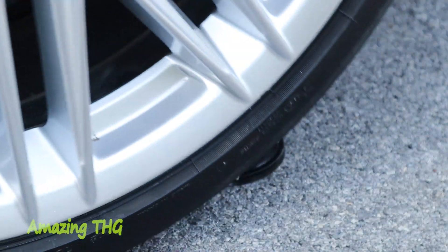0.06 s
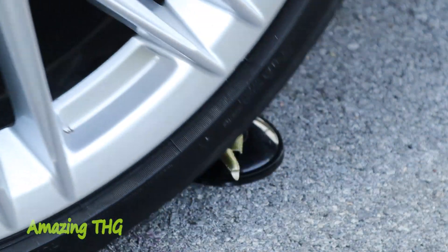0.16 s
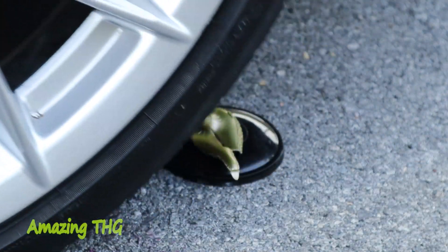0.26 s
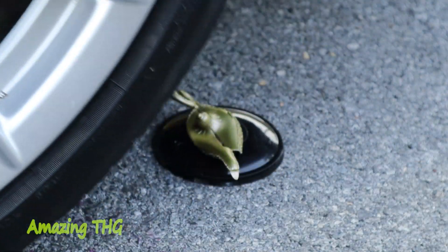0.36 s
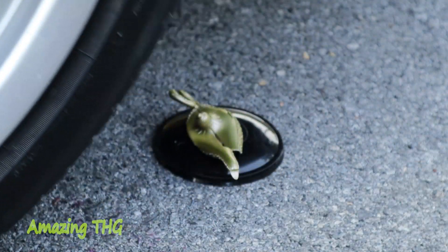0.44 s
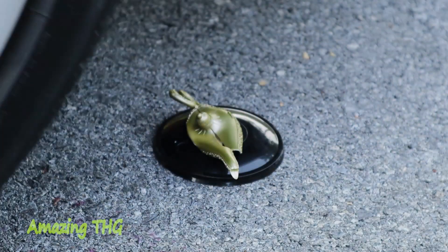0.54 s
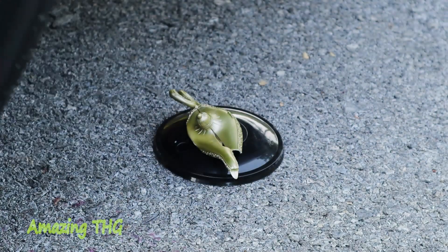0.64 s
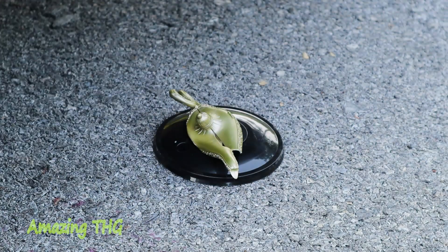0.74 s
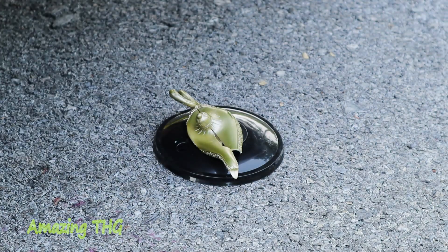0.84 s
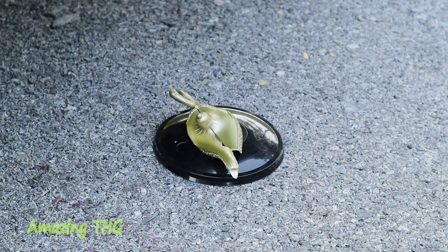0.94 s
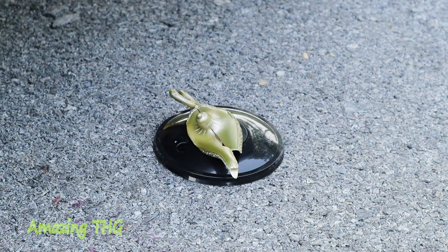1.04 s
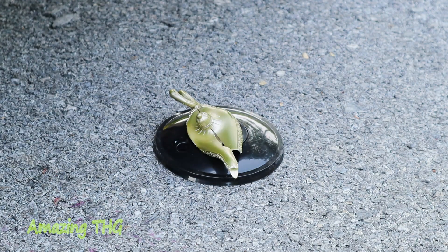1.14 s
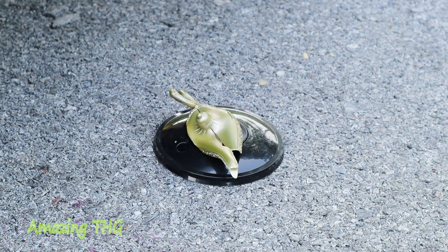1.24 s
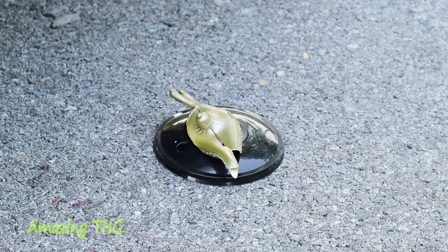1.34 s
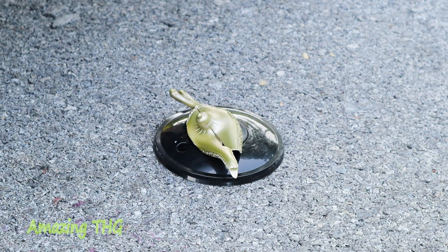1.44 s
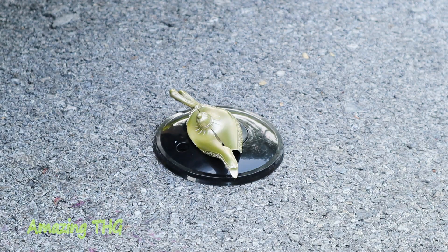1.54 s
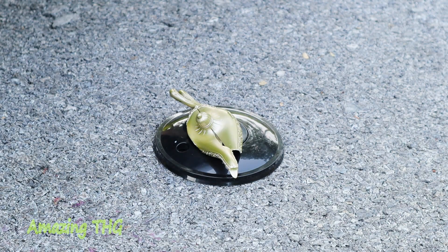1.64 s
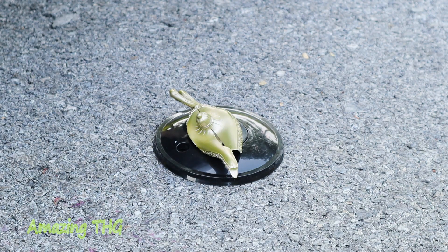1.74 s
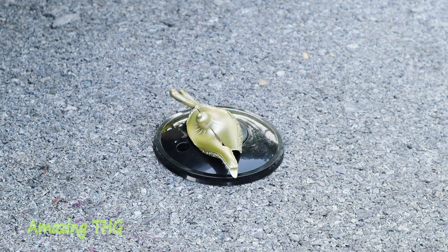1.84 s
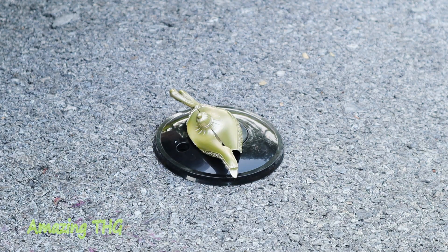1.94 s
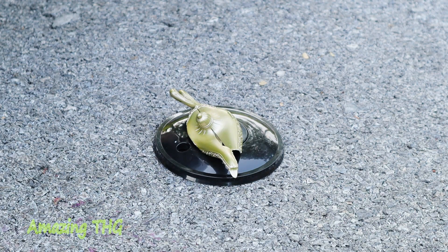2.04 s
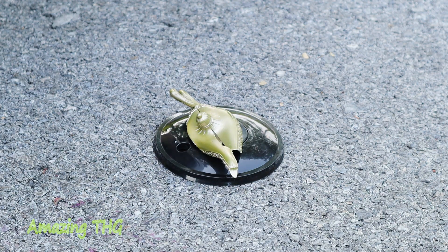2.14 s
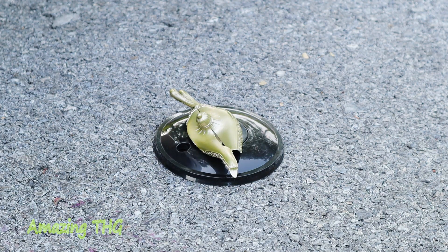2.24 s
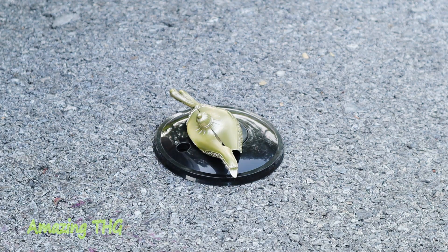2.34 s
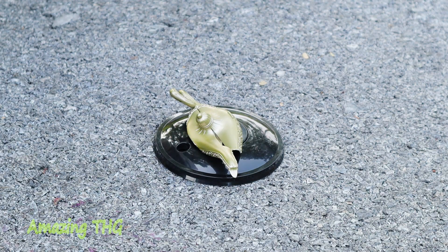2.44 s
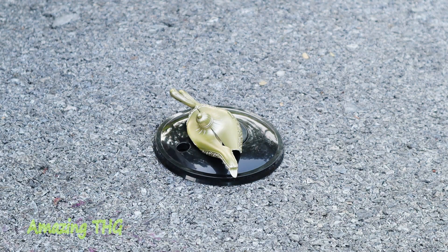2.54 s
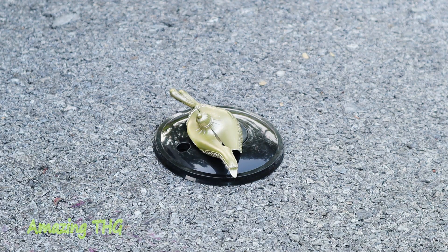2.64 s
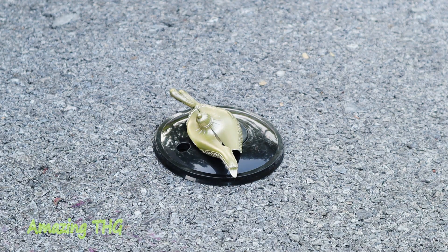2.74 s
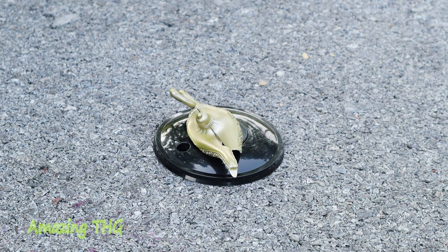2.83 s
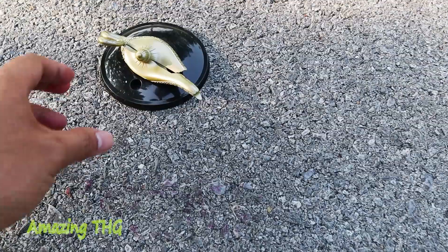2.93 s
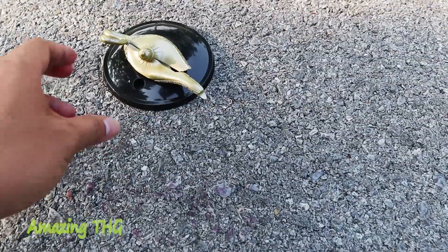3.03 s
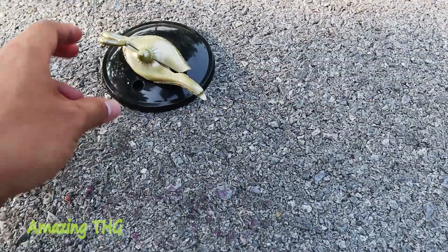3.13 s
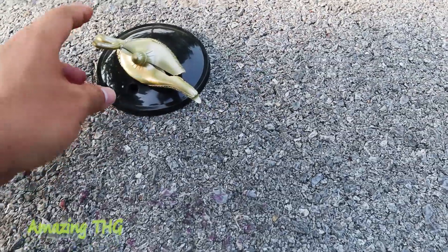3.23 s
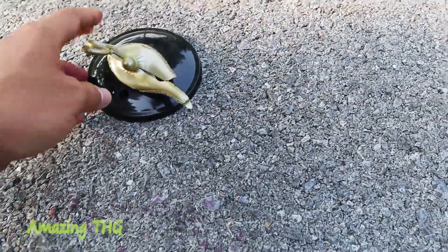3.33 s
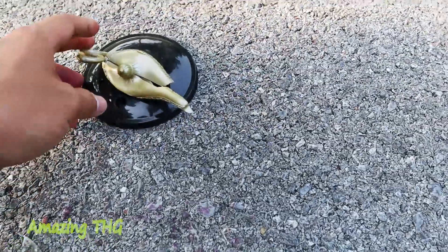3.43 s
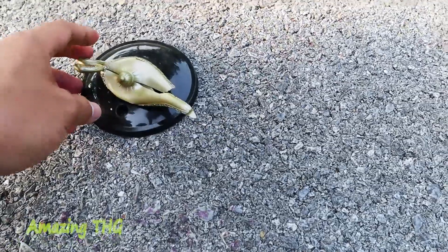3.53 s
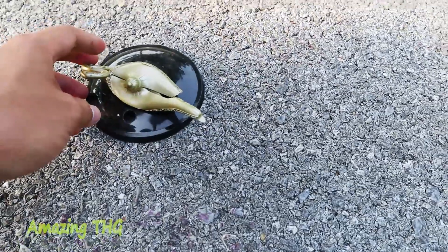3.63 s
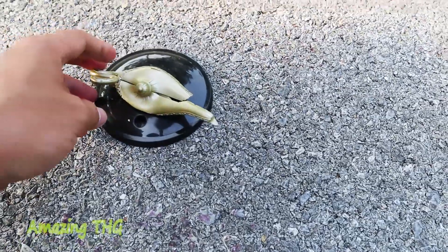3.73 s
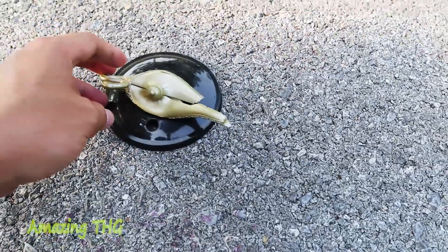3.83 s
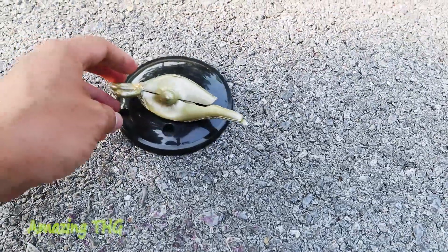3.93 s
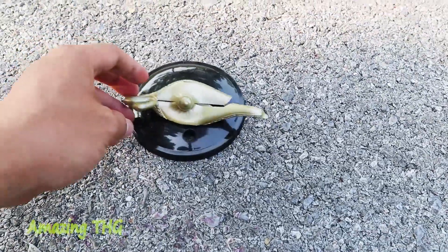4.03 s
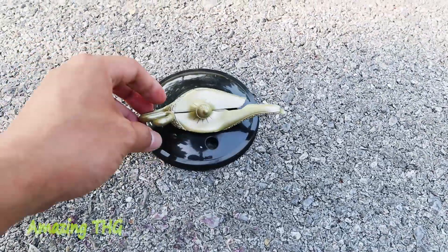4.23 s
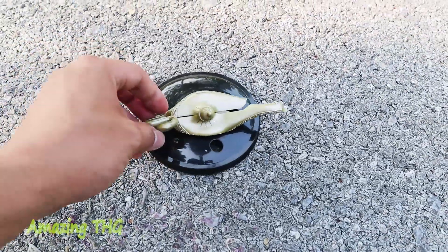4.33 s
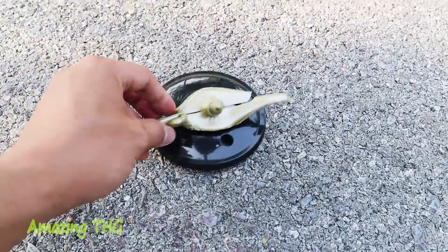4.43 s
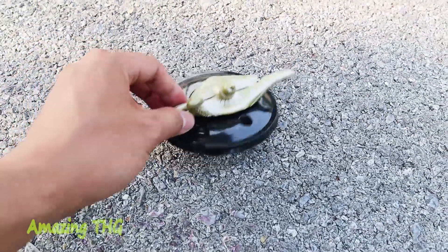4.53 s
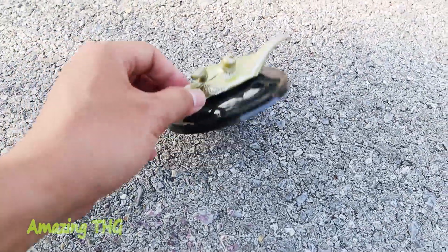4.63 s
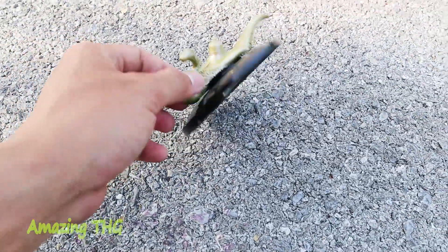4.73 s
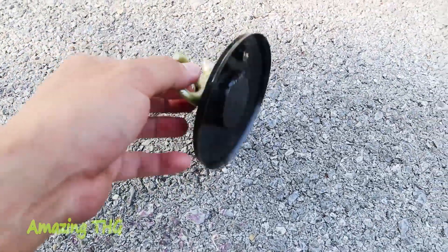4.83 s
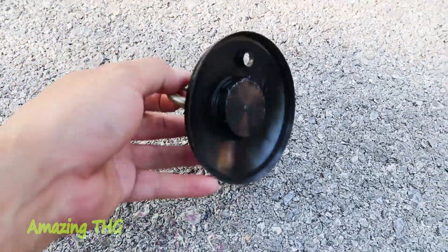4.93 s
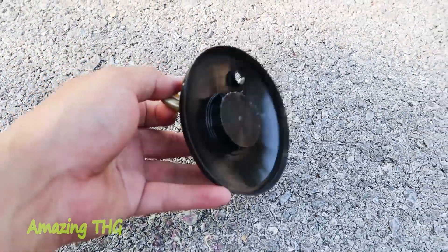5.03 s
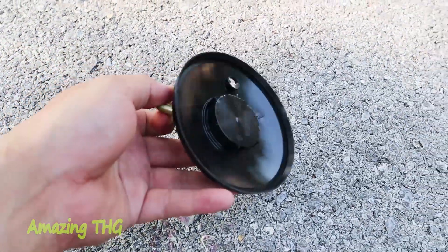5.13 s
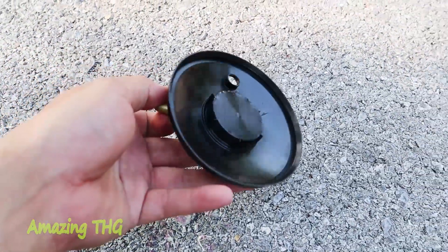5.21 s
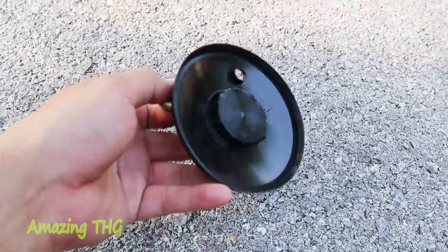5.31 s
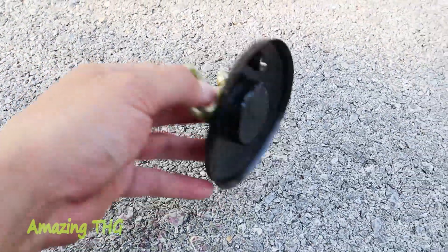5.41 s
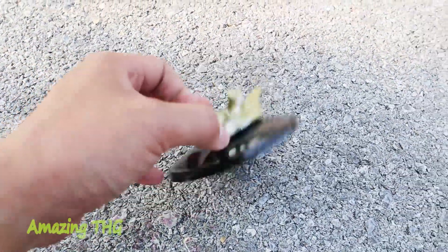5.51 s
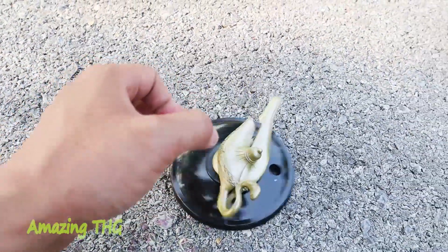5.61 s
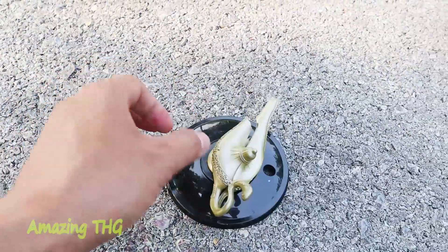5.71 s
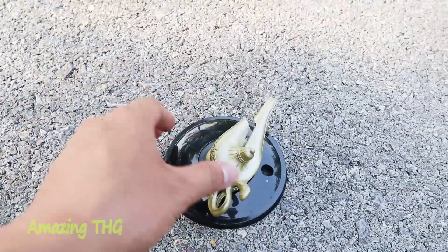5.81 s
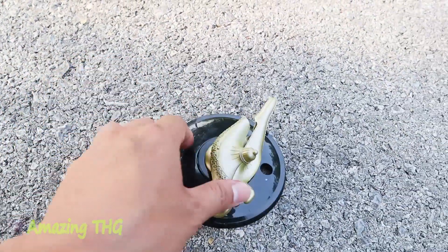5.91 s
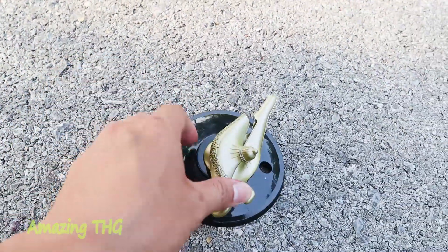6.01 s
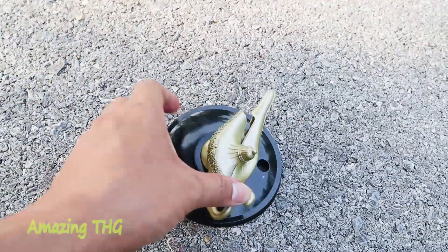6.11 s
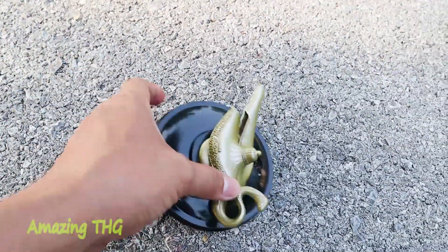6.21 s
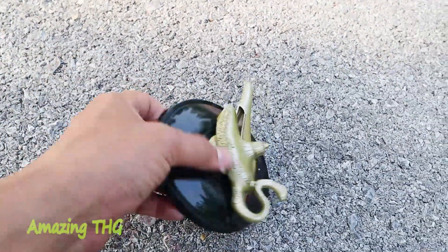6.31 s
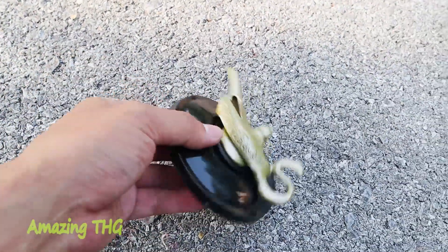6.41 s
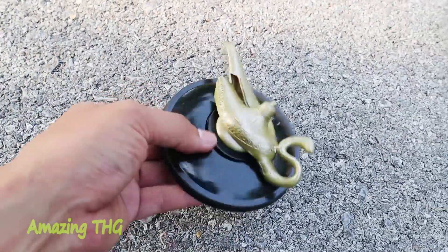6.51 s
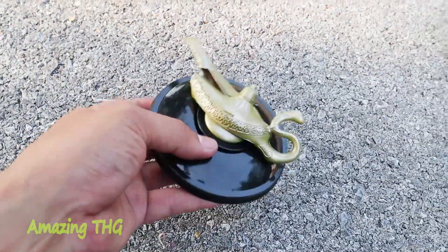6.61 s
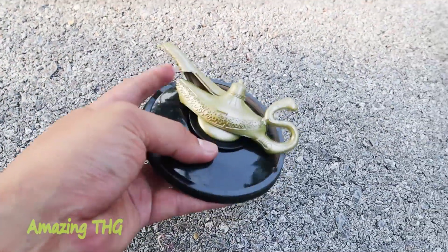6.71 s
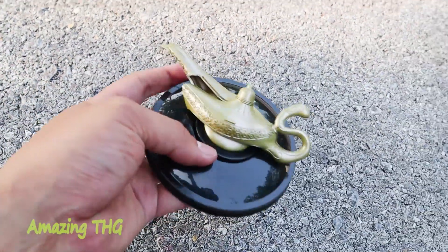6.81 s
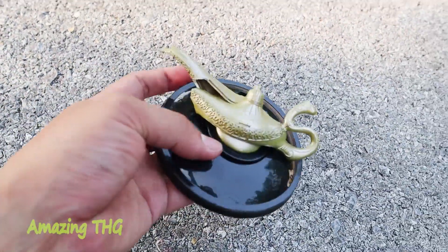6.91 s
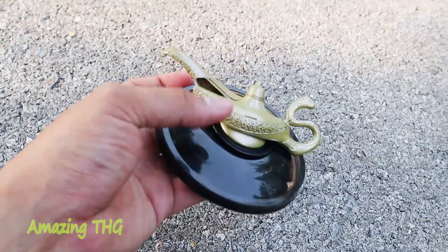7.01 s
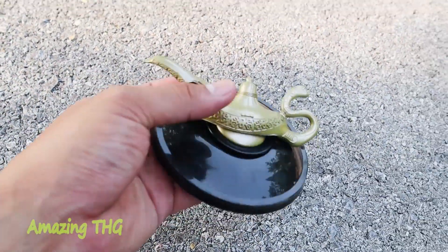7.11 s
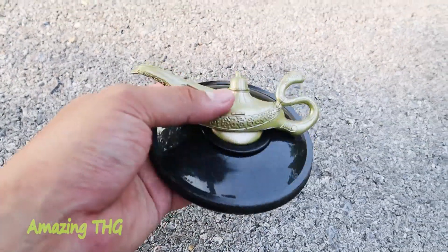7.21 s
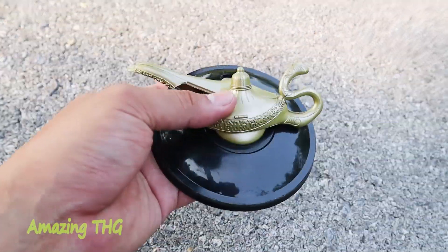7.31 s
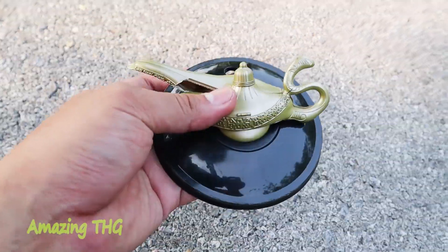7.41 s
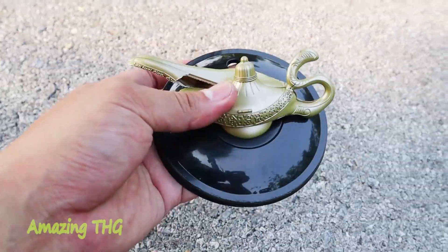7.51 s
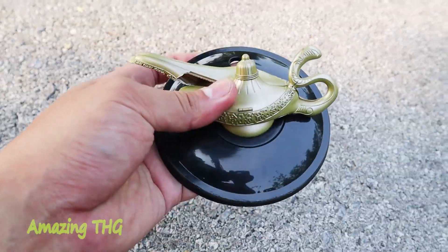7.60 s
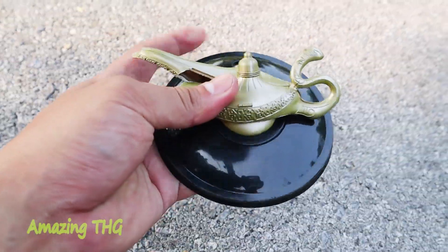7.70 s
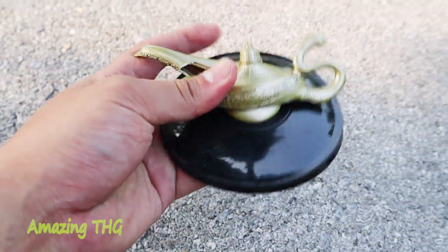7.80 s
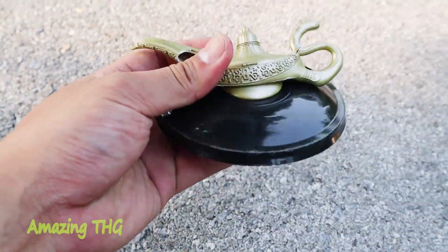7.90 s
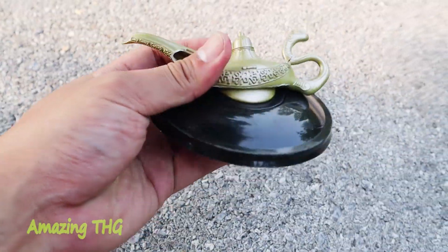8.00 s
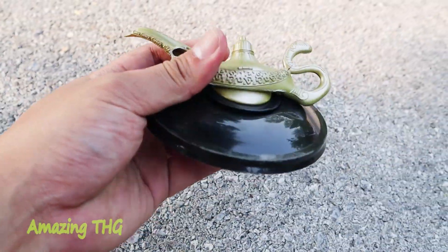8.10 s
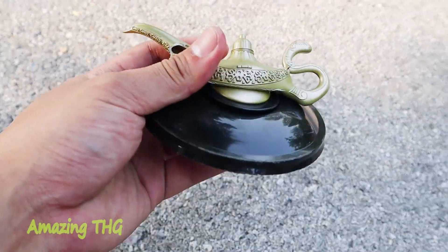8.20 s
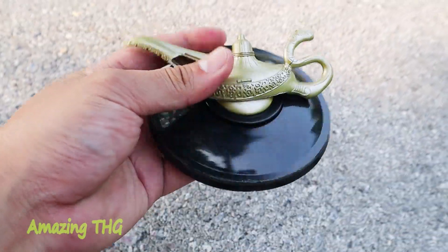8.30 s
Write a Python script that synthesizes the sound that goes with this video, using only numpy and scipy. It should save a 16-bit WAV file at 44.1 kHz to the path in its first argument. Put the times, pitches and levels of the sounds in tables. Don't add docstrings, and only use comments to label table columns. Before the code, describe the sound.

A brittle plastic snap and brief rattle open the scene, followed by quiet car idling with broad airy wash and growing rapid exhaust puffs. An abrupt change brings faint street rumble and hiss. Close by, a thin hollow lid grates across rough asphalt, its edge stuttering; after a pause it lands with loud clacks, bounces and knocks again. Light finger rubs and tiny ticks on a hollow plastic toy finish it. Dry mono phone pickup.

```python
import sys
import numpy as np
from scipy import signal
from scipy.fft import rfft, irfft, next_fast_len
from scipy.io import wavfile
from scipy.ndimage import uniform_filter1d, map_coordinates

SR = 44100
rng = np.random.default_rng(int(sys.argv[2]) if len(sys.argv) > 2 else 0)


def gain_from_decibels(decibels):
    exponent = np.asarray(decibels, float) / 20
    return 10 ** exponent


def generate_wav(sig):
    pcm = np.round(np.clip(np.atleast_2d(sig).T, -1, 1) * 32767).astype(np.int16)
    wavfile.write(sys.argv[1], SR, pcm)


N = 368235


def unit(x):
    return x / np.sqrt(np.mean(x ** 2) + 1e-20)


def curves(rows):
    knot_s, *cols = np.transpose(rows)
    return [np.interp(np.arange(N) / SR, knot_s, c) for c in cols]


def wobble(rate_hz):
    knots = rng.standard_normal(int(N * rate_hz / SR) + 4)
    return map_coordinates(knots, [np.arange(N) * rate_hz / SR])


def filtered(x, response):
    m = next_fast_len(N + SR // 2)
    return irfft(rfft(x, m) * response(np.fft.rfftfreq(m, 1 / SR)), m)[:N]


def colour_db(f_hz, spectrum):
    hz, db = np.transpose(spectrum)
    return np.interp(np.log(f_hz + 1), np.log(hz), db)


def rush(spectrum):
    return unit(filtered(rng.standard_normal(N), lambda f: gain_from_decibels(colour_db(f, spectrum))))


def modes(table, steep):
    def response(f):
        total = 0
        for k, (centre, width, db) in enumerate(table):
            drag = 1j * f * width
            total = total + (-1) ** k * gain_from_decibels(db) * drag / (centre ** 2 - f ** 2 + drag)
        return total ** steep
    return response


def struck(force, spectrum):
    log_gain = colour_db(np.fft.rfftfreq(4096, 1 / SR), spectrum) * np.log(10) / 20
    cepstrum = irfft(log_gain)
    cepstrum[1:2048] *= 2
    cepstrum[2049:] = 0
    ring = irfft(np.exp(rfft(cepstrum)))
    return signal.fftconvolve(force, ring / np.abs(ring).max())[:N]


def held(spectrum, stiff):
    return [(hz * stiff, db) for hz, db in spectrum]


def thin(x):
    return signal.sosfilt(signal.butter(4, 650, "high", fs=SR, output="sos"), x)


# f/Hz, level/dB
DISH = [(150, -63), (290, -47), (500, -21.5), (950, -12), (1250, -4.5), (1650, -0.5), (2200, -7),
        (2700, -22.5), (3400, -31), (6000, -63.5)]
RIM = [(1500, -42.5), (2600, -5.5), (3550, -1.5), (4400, -1), (5300, -5), (6200, -7.5), (9500, -25.5),
       (16000, -53.5)]
SNAP = [(5000, -36), (9000, -5), (13000, 0), (16500, -22)]
HOLLOW = [(100, -50), (300, -21.5), (650, 13), (900, -2.5), (1500, -26), (3000, -57)]


def lid(dish, rim, hollow, stiff, ring, thud_db):
    snap = gain_from_decibels(-11) * rim * np.abs(rim) ** .25
    t = np.arange(SR // 10) / SR
    tones = sum(gain_from_decibels(db - 60 * t / t60) * np.sin(2 * np.pi * hz * stiff * t) for hz, db, t60 in ring)
    thud = gain_from_decibels(thud_db) * struck(dish, held(DISH, stiff))
    body = thud + signal.fftconvolve(dish, thin(tones))[:N]
    return body + struck(rim, RIM) + struck(snap, SNAP) + struck(hollow, HOLLOW)


def blows(rows, stiff, chatter_db, chatter_s, ring, thud_db):
    rows = np.array(rows, float)
    t = np.arange(400) / SR
    shape = gain_from_decibels(chatter_db - 60 * t / chatter_s) * rng.standard_normal((len(rows), 3, len(t)))
    shape[:, :, 0] = -1
    level = gain_from_decibels(rows[:, 1:2] + rows[:, 1:] * [0, 1, 1])
    at = (np.round(rows[:, :1] * SR).astype(int) + np.arange(len(t))).ravel()
    forces = [np.bincount(at, (level[:, k, None] * shape[:, k]).ravel(), N + SR)[:N] for k in range(3)]
    return lid(*forces, stiff, ring, thud_db)


def rattle(rows, gap_s, hollow_db, count=8):
    s, db, rim_db, t60 = np.transpose(rows)[..., None]
    after = np.arange(count) > 0
    chance = rng.standard_normal((3, len(rows), count)) * after
    late = np.cumsum(gap_s * (1 + .12 * chance[0]) * after, axis=1)
    level_db = db - 60 * late / np.abs(t60) + 1.1 * chance[1]
    columns = s + late, level_db, rim_db + 3 * chance[2], hollow_db + 0 * late
    return np.transpose([c.ravel() for c in columns])


def pressure(strokes, t, swell):
    return sum(gain_from_decibels(db) * np.interp(t, [a, peak, b], [0, 1, 0]) ** swell for a, peak, b, db in strokes)


def friction(strokes, body, per_s, spread_db, clump_db, swell):
    hits = rng.random(N) < per_s / SR
    grains = hits * rng.standard_normal(N) * gain_from_decibels(spread_db * rng.standard_normal(N))
    shaken = unit(struck(grains * gain_from_decibels(clump_db * wobble(100)), body))
    return shaken * pressure(strokes, np.arange(N) / SR, swell)


def slide(strokes):
    grit = [(hz, db - 29) for hz, db in RIM[2:]]
    return friction(strokes, [*DISH[:-2], *grit], 2000, 2.5, 3.5, .8)


# f/Hz, level/dB
SCUFF_SIDES = [(950, -9), (1250, -17), (2200, -9)]
# f/Hz, level/dB re rim
SCUFF_RIM = [(3520, -4.5), (5320, -31.5)]


def scuffs(rows):
    s, db, hz, rim_db = np.transpose(rows)[..., None]
    t = np.arange(500) / SR
    chance = rng.standard_normal((len(rows), 14))
    rise_s = .0011 * gain_from_decibels(1.3 * chance[:, :1])
    swell = gain_from_decibels(db - 2.06) * t / rise_s * np.exp(1 - t / rise_s)

    def tone(f, gain_db, k):
        detune = 1 + .05 * chance[:, k + 6:k + 7]
        return gain_from_decibels(gain_db + 3 * chance[:, k:k + 1]) * np.sin(2 * np.pi * f * detune * t + 9 * f)

    ring = np.sin(2 * np.pi * hz * t) + sum(tone(f, g, k + 1) for k, (f, g) in enumerate(SCUFF_SIDES))
    ring = ring + gain_from_decibels(rim_db) * sum(tone(f, g, k + 4) for k, (f, g) in enumerate(SCUFF_RIM))
    fizz = gain_from_decibels(rim_db - 10) * swell * rng.standard_normal(swell.shape)
    at = (np.round((s - rise_s) * SR).astype(int) + np.arange(len(t))).ravel()
    body = thin(np.bincount(at, (swell * ring).ravel(), N))
    return body + struck(np.bincount(at, fizz.ravel(), N), RIM)


# t/s, firing rate f/Hz, hum level/dB
IDLE = [
    (0, 24.1, -69),
    (1.2, 23.85, -70),
    (2.2, 23.7, -71),
    (2.45, 24.5, -71),
    (2.75, 24.9, -70),
    (2.95, 25, -70),
]
ORDER = [(1, -14.5), (2, -14.5), (3, -1), (4, -11), (5, -11), (6, -16), (8, -15), (10, -13), (13, -6.5),
         (14, -10), (26, -8)]
# t/s, tyre and fan wash level/dB, exhaust chuff level/dB
CAR = [
    (0, -57.5, -83),
    (.5, -57.5, -82),
    (1.1, -60.5, -69),
    (1.25, -62, -63),
    (1.42, -63, -61),
    (2.3, -65.5, -57.5),
    (2.95, -65, -57),
]
# f/Hz, level/dB per Hz
WASH = [(76, -39), (130, -5.5), (210, -10), (315, 0), (357, -5), (630, -3), (807, -4), (2030, -4.5),
        (3300, -13.5), (5380, -25), (9000, -32.5), (11700, -60), (19800, -120)]
# f/Hz, width/Hz, level/dB
PIPE = [(972, 306, 7), (2015, 250, -1.5), (3300, 200, -6.5), (320, 75, -0.5), (626, 19, -6.5)]


def car():
    firing_hz, hum_db = curves(IDLE)
    wash_db, chuff_db = curves(CAR)
    turns = np.cumsum(firing_hz) / SR
    turns = turns - turns[round(1.483 * SR)]
    hum = 0
    for k, db in ORDER:
        level = gain_from_decibels(db + .5 * k ** .7 * wobble(6 + k))
        hum = hum + level * np.sin(2 * np.pi * (k * turns + rng.random()))
    strength = gain_from_decibels(.6 * rng.standard_normal(size=128))[np.round(turns).astype(int) % 128]
    puff = (turns + .3) % 1
    gate = strength * puff * np.exp(-puff / .19) * gain_from_decibels(1.5 * wobble(150))
    chuff = unit(filtered(gate * rng.standard_normal(N), modes(PIPE, 1.7)))
    wash = gain_from_decibels(wash_db + 1 + .8 * wobble(11)) * rush(WASH)
    return gain_from_decibels(hum_db + 4) * hum + gain_from_decibels(chuff_db) * chuff + wash


# start t/s, peak t/s, end t/s, level/dB
CREAK = [
    (0, .001, .045, -44),
    (.03, .047, .07, -54),
    (.09, .122, .132, -50),
    (.131, .137, .19, -33),
]
# f/Hz, level/dB
SPLINTER = [(300, -26.5), (950, -9), (1500, -8.5), (2700, -9.5), (3700, -13.5), (5200, -19), (15000, -34)]


def creak():
    return gain_from_decibels(-2) * friction(CREAK, SPLINTER, 5000, 2.5, 1.5, 1.8)


# t/s, dish level/dB, rim level/dB re dish, rattle t60/s
CRACKS = [(.0005, -32, -1, .03), (.0921, -49, -4, .01), (.1159, -37, -9, .01), (.1322, -18, -20, .006),
          (.1346, -8, -3, .006), (.1385, -18, -10, .07), (.1872, -34, -17, .05), (.1946, -25, -19, .01),
          (.1985, -27, -24, .02), (.2205, -34, -11, .01), (.2233, -34, -16, .01)]
# f/Hz, level/dB, t60/s
PINNED_RING = [(1030, -12.5, 0.02), (1490, -10.5, 0.018), (2680, -15, 0.013), (3800, -22.5, .02),
               (5530, -30, .012)]


def snaps():
    return blows(rattle(CRACKS, .0037, -23), .99, -22, .012, PINNED_RING, -4.5)


# t/s, f/Hz, level/dB
PINGS = [(.132, 2600, -21), (.132, 3850, -29), (.1405, 1500, -22), (.194, 1600, -33), (5.775, 1720, -34),
         (6.231, 4200, -47), (6.464, 2350, -53), (7.787, 1730, -38), (7.787, 2620, -38), (7.787, 4030, -43),
         (7.948, 2080, -47), (4.108, 5500, -54), (4.634, 5300, -53), (6.342, 4900, -51), (7.805, 1900, -59),
         (7.825, 1850, -59), (7.843, 1800, -59), (7.862, 1800, -60), (7.88, 1850, -55), (7.975, 2000, -53),
         (7.92, 3000, -56)]


def pings():
    out, t = np.zeros(N), np.arange(SR // 20) / SR
    swell = t / .0022 * np.exp(1 - t / .0022)
    for s, hz, db in PINGS:
        out[round(s * SR):][:len(t)] += gain_from_decibels(db) * swell * np.sin(2 * np.pi * hz * t)
    return out


SCRAPE = [(.17, .197, .212, -49), (.215, .225, .245, -54), (5.625, 5.632, 5.65, -46),
          (5.645, 5.655, 5.7, -53), (5.703, 5.715, 5.755, -34), (5.755, 5.77, 5.79, -43),
          (5.958, 5.967, 5.99, -51), (5.995, 6.008, 6.02, -51), (6.17, 6.21, 6.22, -60),
          (6.215, 6.23, 6.248, -44), (6.26, 6.29, 6.32, -62), (6.318, 6.34, 6.362, -38),
          (6.36, 6.38, 6.41, -48), (6.415, 6.427, 6.445, -54)]


def scrape():
    return slide(SCRAPE)


SQUEAL = (.49, .59, 12850, -86)


def squeal():
    start, end, hz, db = SQUEAL
    t = np.arange(N) / SR
    swell = np.sin(np.pi * np.clip((t - start) / (end - start), 0, 1))
    return gain_from_decibels(db) * swell * np.sin(2 * np.pi * hz * t)


# f/Hz, level/dB per Hz
STREET = [(12, -34.5), (20, 1), (32, -23.5), (65, -8.5), (123, -3.5), (181, -5), (442, -4.5), (601, -0.5),
          (653, -4), (751, 1), (1470, -2.5), (1590, -0.5), (2710, -11), (15700, -41)]
# t/s, level/dB
STREET_DB = [
    (2.96, -67.5),
    (3.4, -65.5),
    (5, -68),
    (7, -67.5),
    (8.35, -68),
]


def street():
    level_db = curves(STREET_DB)[0] + .516 * wobble(4.8) + .25 * wobble(4.9)
    return gain_from_decibels(level_db) * rush(STREET)


# t/s, dish level/dB, rim level/dB re dish, hollow level/dB re dish
CLICKS = [(3.4545, -36, -5, -19), (5.6521, -37, -4, -8), (5.658, -40, -6, -8), (6.8386, -43, -11, -18),
          (7.3478, -48, -8, -13), (7.3572, -37, -10, -11), (7.3607, -44, -18, -12), (7.3669, -45, -13, -16),
          (7.5446, -43, -3, -30), (7.7877, -32, -1, -21), (7.7903, -28, 4, -17), (7.7926, -36, -1, -11),
          (7.8119, -49, -7, -20), (7.9004, -45, -11, -23), (7.9051, -45, -14, -15), (7.9083, -45, -16, -19),
          (7.9208, -48, -13, -16), (7.9494, -42, -12, -25), (7.9556, -40, -17, -20),
          (8.3274, -49, -10, -17)]
# f/Hz, level/dB, t60/s
TOY_RING = [(660, -31, 0.011), (1750, -39, 0.005), (1940, -13.5, 0.015), (2620, -10.5, 0.013),
            (4120, -29, .01)]


def clicks():
    return blows(CLICKS, 1.135, -13, .0068, TOY_RING, -2.5)


DRAG = [(3.488, 3.5, 3.55, -45), (3.52, 3.56, 3.605, -41), (3.59, 3.6, 3.645, -56),
        (3.635, 3.68, 3.725, -41), (3.725, 3.739, 3.755, -51), (3.745, 3.785, 3.83, -42),
        (3.82, 3.84, 3.86, -48), (3.855, 3.875, 3.905, -46), (3.9, 3.97, 4.04, -43),
        (4.02, 4.06, 4.11, -39), (4.07, 4.135, 4.155, -38), (4.15, 4.17, 4.19, -44),
        (4.185, 4.205, 4.28, -41), (4.27, 4.3, 4.335, -42), (4.33, 4.345, 4.375, -47),
        (4.355, 4.39, 4.415, -50), (4.41, 4.45, 4.5, -49)]


def drag():
    return slide([(a, peak, b, db - 1.5) for a, peak, b, db in DRAG])


# t/s, level/dB, main mode f/Hz, rim level/dB re level
STONES = [(3.4998, -40, 1520, -27), (3.5096, -28.5, 1770, -28), (3.5186, -29, 1790, -28),
          (3.5338, -28.5, 1310, -23), (3.538, -32, 1560, -23), (3.551, -27, 1540, -26),
          (3.5571, -32, 1660, -23), (3.5633, -41, 1730, -32), (3.5672, -29, 1260, -29),
          (3.5715, -29, 1830, -30), (3.5986, -56, 1700, -32), (3.6024, -60, 1560, -33),
          (3.6431, -32.5, 1790, -36), (3.6465, -38, 1590, -19), (3.6557, -35.5, 1700, -20),
          (3.66, -34, 1600, -22), (3.6693, -36, 1420, -21), (3.6749, -33, 1690, -22),
          (3.6814, -28.5, 1770, -13), (3.6872, -42, 1600, -23), (3.6942, -29.5, 1720, -29),
          (3.698, -30, 1600, -15), (3.7041, -43, 1580, -33), (3.7113, -37, 1750, -18),
          (3.7164, -34, 1600, -21), (3.7376, -45, 1510, -28), (3.7419, -47, 1750, -33),
          (3.765, -34, 1520, -29), (3.7734, -30, 2110, -22), (3.7765, -33, 1500, -21),
          (3.7806, -34, 1440, -16), (3.7884, -28, 1520, -23), (3.7915, -36, 960, -22),
          (3.8063, -28.5, 1580, -18), (3.8168, -40, 1750, -19), (3.8199, -38, 2140, -29),
          (3.852, -33, 1710, -26), (3.8691, -27, 1340, -31), (3.873, -30.5, 1580, -17),
          (3.8803, -34, 1490, -25), (3.8851, -40, 1530, -26), (3.8889, -41, 1650, -34),
          (3.8928, -32, 1620, -28), (3.9333, -35, 1740, -22), (3.9442, -36, 1700, -23),
          (3.9478, -39, 1680, -28), (3.9527, -31.5, 1610, -22), (3.959, -30.5, 1790, -14),
          (3.969, -29, 1650, -19), (3.973, -29, 1520, -22), (3.977, -30.5, 1660, -21),
             (3.9865, -29, 1410, -23), (3.9954, -23.5, 1730, -20.5), (4.024, -24, 1810, -17.5),
             (4.0452, -22.5, 1640, -23), (4.054, -28, 1830, -21), (4.0647, -28, 1610, -23),
             (4.0704, -21.5, 1940, -16.5), (4.0819, -29, 1560, -24), (4.0865, -26, 1490, -20),
             (4.0976, -27, 1620, -25), (4.104, -32, 1680, -25), (4.1082, -23.5, 1680, -23),
             (4.115, -28, 1660, -30), (4.121, -28, 1420, -23), (4.1318, -31, 1840, -32),
             (4.1335, -27, 1640, -32), (4.1385, -34, 1410, -27), (4.1427, -21.5, 1650, -19.5),
             (4.1633, -22, 1730, -31), (4.178, -32, 1490, -28), (4.1953, -29.5, 2080, -18),
             (4.2005, -35, 1850, -28), (4.204, -37, 1460, -32), (4.211, -30.5, 1490, -26),
             (4.2203, -34, 1750, -27), (4.2272, -33.5, 1750, -16.5), (4.2358, -35, 1630, -21),
             (4.2428, -32, 1630, -31), (4.261, -34, 1580, -27), (4.2827, -29, 1690, -31),
             (4.291, -27.5, 1600, -34), (4.2943, -33, 1980, -27), (4.299, -39, 1690, -27),
             (4.3048, -29, 1800, -23), (4.3105, -37, 1660, -33), (4.3154, -34.5, 1660, -29),
             (4.3215, -31, 1680, -32), (4.3384, -37, 1690, -22), (4.3443, -28.5, 1620, -25),
             (4.3848, -41, 1510, -32), (4.398, -41, 1720, -37), (4.4424, -34.5, 1720, -35),
             (4.4505, -30, 1670, -31), (4.4615, -35, 1770, -35), (4.5, -33.5, 1620, -30),
             (4.5125, -25.5, 1810, -30), (4.5244, -36, 1800, -18.5)]


def stones():
    return scuffs(STONES)


EDGE = [
    (4.42, 4.47, 4.54, -50),
    (4.545, 4.63, 4.65, -48),
    (4.645, 4.675, 4.72, -40),
    (4.69, 4.745, 4.79, -39),
    (4.78, 4.8, 4.855, -48),
]
# f/Hz, level/dB
LIP = [(300, -34), (700, -17), (1350, -6), (1750, -2), (2200, -6), (2900, -24), (4400, -34.5), (5250, -35),
       (6200, -38), (14000, -61)]


def edge():
    return gain_from_decibels(-2) * friction(EDGE, LIP, 1800, 2.5, 2.1, .92)


def pebbles(strokes, count):
    start, end = strokes[0][0], strokes[-1][2]
    s = start + (end - start) * (np.arange(count) + rng.random(count)) / count
    chance = rng.standard_normal((count, 2))
    press_db = 20 * np.log10(pressure(strokes, s, .7) + 1e-9)
    return np.transpose([s, press_db + 8 + 3.5 * chance[:, 0], -22 + 4 * chance[:, 1], -32 + 0 * s])


# t/s, dish level/dB, rim level/dB re dish, rattle t60/s
JUDDER = [(4.6368, -22, -22, 0.021), (4.6557, -31, -27, .06), (4.6655, -40, -14, 0.0093),
          (4.6698, -20.5, -37, 0.036), (4.6897, -27.5, -27, .02), (4.7023, -24.5, -28, 0.059),
          (4.7177, -22, -21, 0.011), (4.7223, -20.5, -26.5, .02), (4.7423, -17.5, -26.5, 0.018),
          (4.7467, -16, -39, 0.011), (4.7505, -27, -11.5, 0.0092), (4.76, -15.5, -19, 0.013),
          (4.7642, -20.5, -21, 0.018), (4.775, -23, -19, 0.017), (4.7914, -20, -42, .04),
          (4.8102, -28, -27, 0.015), (4.825, -27, -20, 0.017), (4.8359, -25.5, -26, .02)]
# f/Hz, level/dB, t60/s
LID_RING = [(1020, -30, .018), (1680, -13, .022), (2200, -18, .015), (3520, -44, .012), (5280, -40, .012)]


def judder():
    contacts = [*rattle(JUDDER, .004, -28.5), *pebbles(EDGE[2:], count=16)]
    return blows(contacts, 1.14, -15, .011, LID_RING, -2.5)


RUB = [
    (5.54, 5.575, 5.59, -65),
    (6.455, 6.468, 6.485, -60),
    (6.58, 6.618, 6.66, -56),
    (6.735, 6.768, 6.795, -59),
    (6.81, 6.86, 6.94, -57),
    (7.335, 7.355, 7.378, -54),
    (7.8, 7.86, 7.89, -67),
    (7.89, 7.903, 7.945, -56),
    (7.942, 7.953, 7.963, -51),
    (7.965, 7.978, 7.995, -63),
]
# f/Hz, level/dB
TOY = [(150, -55), (310, -27), (650, -3.5), (1280, -1.5), (1800, -3), (2080, 4.5), (2350, -10), (2800, -9),
       (4000, -17.5), (7000, -26), (14000, -38)]


def rub():
    return friction(RUB, TOY, 5000, 2.5, 1.5, .9)


# t/s, dish level/dB, rim level/dB re dish, rattle t60/s
DROPS = [(5.6268, -18, -16, .005), (5.6313, -15, -8, .005), (5.704, -1, -23, .015), (5.7162, -5, -11, .004),
         (5.7184, -6, -18, .02), (5.7257, -12, -12, .013), (5.7358, -17, -25, .016),
         (5.7426, -24, -15, .01), (5.7507, -34, -19, .01), (5.7605, -27, -37, .005),
         (5.7637, -27, -36, .005), (5.7696, -21, -26, .015), (5.7774, -35, -27, .03),
         (5.7991, -42, -25, .01)]


def landing():
    tremble = [(5.6716 + k * .0065, -46, -13, -27) for k in range(5)]
    return blows([*rattle(DROPS, .003, -31), *tremble], 1.049, -20.5, .012, LID_RING, -.5)


# t/s, dish level/dB, rim level/dB re dish, rattle t60/s
TURNS = [(5.9654, -28.5, -12.5, 0.02), (6.0102, -39.5, -28, 0.0085), (6.223, -31.5, -17, 0.075),
         (6.2322, -37.5, -3.5, 0.042), (6.2397, -37, -26, 0.011), (6.3229, -34, -12, 0.036),
         (6.3293, -18, -25, 0.027), (6.3362, -34, -22, 0.012), (6.3402, -24.5, -10, 0.0083),
         (6.3436, -21, -20, 0.031), (6.35, -16.5, -47, .008), (6.3693, -30.5, -31, .01),
         (6.3767, -28, -19, 0.024), (6.3844, -40, -9, 0.012), (6.3972, -35, -20, 0.076),
         (6.4032, -30, -19, 0.0097)]


def turning():
    return blows(rattle(TURNS, .003, -32), 1.049, -20.5, .012, LID_RING, -.5)


# t/s, level/dB, main mode f/Hz, rim level/dB re level
RUSTLE = [(6.6027, -57, 1280, -9), (6.6118, -51, 1980, -13), (6.6176, -45, 1340, -18),
          (6.6275, -47.5, 2600, -12), (6.6309, -49, 1230, -17), (6.6493, -52, 1390, -9),
          (6.7464, -57, 1500, -15), (6.7566, -56, 1750, -10), (6.7622, -53, 1620, -10),
          (6.7662, -51, 1880, -10), (6.7695, -53.5, 1400, -16), (6.8391, -47, 1410, -19),
          (6.8552, -48, 910, -14), (6.8591, -50, 1020, -18), (6.8653, -55, 1870, -11),
          (6.8693, -53, 2270, -17)]


def rustle():
    return scuffs(RUSTLE)


def scene():
    before = uniform_filter1d((np.arange(N) < 2.962 * SR) * 1., size=200)
    place = before * (car() + squeal()) + (1 - before) * street()
    tyre = creak() + snaps()
    ground = scrape() + drag() + stones() + edge() + judder() + landing() + turning()
    toy = pings() + clicks() + rub() + rustle()
    return (place + tyre + ground + toy)[None]


def low_pass(x):
    return signal.sosfilt(signal.butter(12, 16450, fs=SR, output="sos"), x)


def record(dry):
    hiss = filtered(gain_from_decibels(-74.5) * rng.standard_normal(N), lambda hz: hz < 15750)
    mix = np.clip(dry + hiss, -1, 1)
    return low_pass(mix)


dry = scene()
out = record(dry)
generate_wav(out)
```